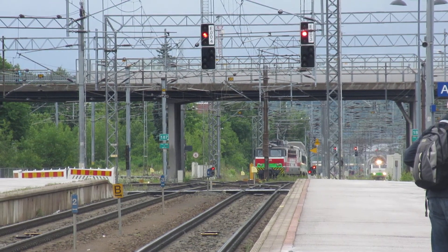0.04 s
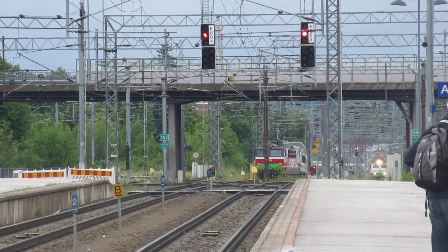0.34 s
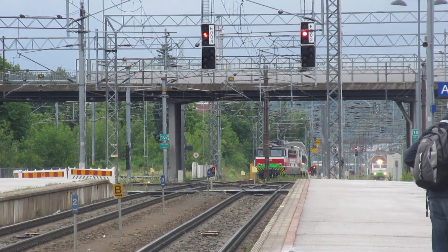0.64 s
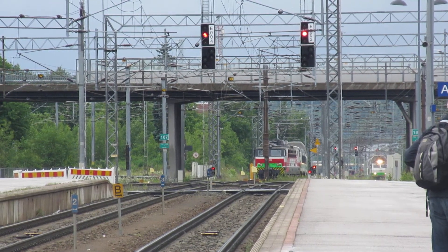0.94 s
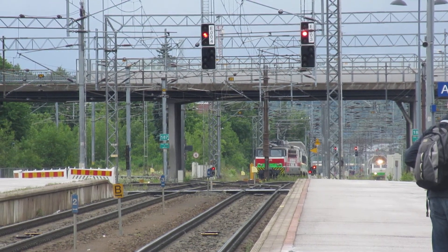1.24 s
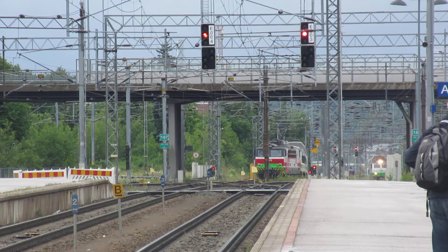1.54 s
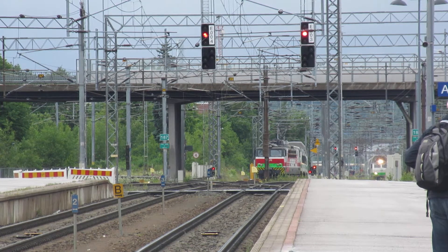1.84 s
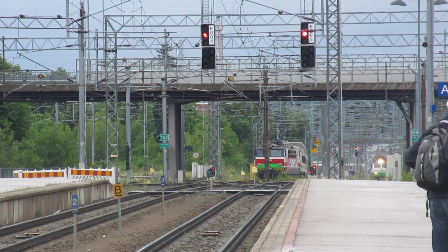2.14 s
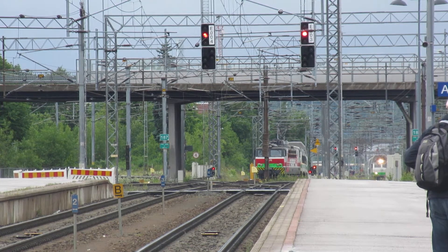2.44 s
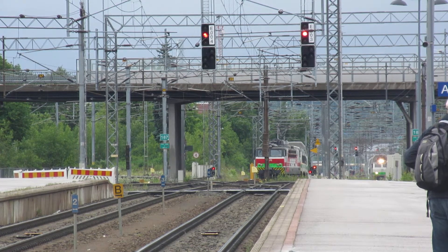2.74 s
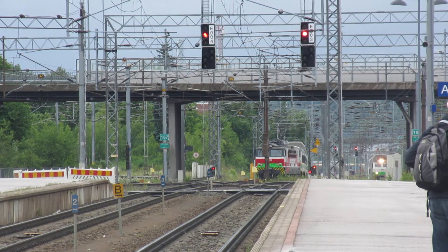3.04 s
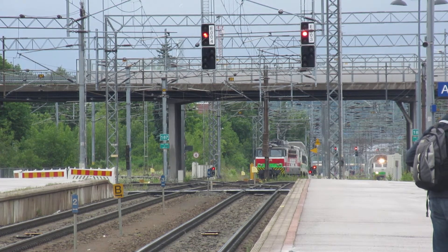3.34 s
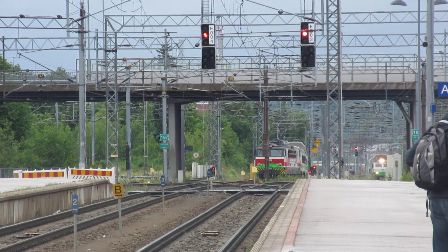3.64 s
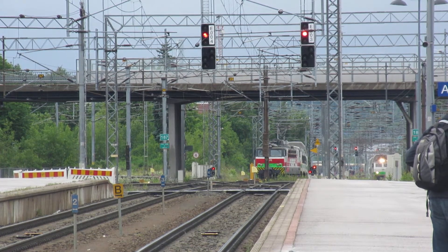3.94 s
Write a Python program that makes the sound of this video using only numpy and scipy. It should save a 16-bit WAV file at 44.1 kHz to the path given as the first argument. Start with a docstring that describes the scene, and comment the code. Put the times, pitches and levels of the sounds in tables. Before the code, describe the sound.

Wind on the microphone comes first in light puffs, then as a loud, fluttering gust that briefly pushes down the background. On an open station platform, far trains rumble and hum throughout, with a faint early squeal and one tiny click.

```python
"""Wind on an open railway platform

Far trains rumble, with the hum and thin whine of their electric drives and a faint squeal.
Wind nudges the microphone, one tiny click sounds, then a gust buffets the microphone. Two buffets
overload the recorder, whose gain control ducks the whole station and lets it creep back."""
import sys
import numpy as np
from scipy import signal
from scipy.fft import rfft, irfft
from scipy.io import wavfile
from scipy.ndimage import uniform_filter1d

SR = 44100
rng = np.random.default_rng(int(sys.argv[2]) if len(sys.argv) > 2 else 0)


def wrap_up_sound(samples):
    """Save the sound to the file named by the first command line argument, as 16-bit audio."""
    columns = np.atleast_2d(samples).T
    # keep every value between -1 and 1, then stretch to whole-number steps
    tamed = np.clip(columns, -1, 1)
    steps = np.round(tamed * 32767).astype(np.int16)
    wavfile.write(sys.argv[1], SR, steps)


N = 176400
T = np.arange(N) / SR


def amp(db):
    """Decibels to gain."""
    return 10 ** (np.asarray(db) / 20)


def unit(x):
    """Scales to rms 1."""
    return x / np.sqrt(np.mean(x ** 2) + 1e-20)


def curve(rows):
    """A table of (time_s, value) read at every sample."""
    return np.interp(T, *np.transpose(rows))


def colour(spectrum, hz):
    """Gain of a table of (frequency_hz, level_db) at these frequencies."""
    points_hz, db = np.transpose(spectrum)
    return amp(np.interp(np.log(hz + 1), np.log(points_hz + 1), db))


def noise(shape):
    """Noise of rms 1 whose spectrum is shape(hz)."""
    white = rfft(rng.standard_normal(N))
    return unit(irfft(white * shape(np.fft.rfftfreq(N, 1 / SR)), N))


def drift(rate_hz):
    """Random wander of rms 1, up to about this rate."""
    return noise(lambda f: np.exp(-(f / rate_hz) ** 2) * (f > 0))


def tone(hz):
    """A sine of rms 1 that follows a pitch curve."""
    return np.sqrt(2) * np.sin(2 * np.pi * (np.cumsum(hz) / SR + rng.random()))


# Far trains and town, heard from the open platform: frequency_hz, relative_db
RUMBLE_SPECTRUM = [(15, -18), (30, -3), (60, -6), (110, -2.5), (170, 0), (240, -6.5), (330, -11),
                   (450, -11), (600, -12), (760, -17), (920, -16.5), (1100, -20.5), (1600, -22.5),
                   (2200, -27), (3000, -29.5), (3950, -33), (4450, -39), (7000, -48), (11000, -55),
                   (15000, -63.5)]
def rumble(level_db=-27, patch_db=1, swell_db=-0.03):
    """Trains and town blur with distance into dull noise with drifting patches of colour."""
    frames, hz = N // 512 + 5, np.fft.rfftfreq(2048, 1 / SR)
    real, imaginary, patches = rng.standard_normal((3, frames, len(hz)))
    patches = uniform_filter1d(patches, size=10, axis=0)  # smooth in time
    patches = unit(uniform_filter1d(patches, size=12, axis=1))  # and in frequency
    spectra = (real + 1j * imaginary) * colour(RUMBLE_SPECTRUM, hz) * amp(patch_db * patches)
    wash = signal.istft(spectra.T, nperseg=2048, noverlap=1536)[1][:N]
    return unit(wash) * amp(level_db + swell_db * drift(rate_hz=18))


# A far locomotive's hum as it reaches the platform: time_s, level_db
HUM_LEVEL = [(0, -34), (.17, -32.5), (.35, -35), (.43, -53), (.52, -38), (.66, -40.5), (.8, -34.5),
             (1.0, -32.5), (1.1, -50), (1.24, -48), (1.33, -35), (1.5, -30.5), (1.56, -41.5), (1.68, -34),
             (1.82, -38.5), (2.0, -29.5), (2.22, -32.5), (2.31, -60), (2.48, -32), (2.75, -59.5),
             (4, -44.5)]
def locomotive_hum(pitch_hz=406.1, waver=0.0036):
    """One wavering tone that fades in and out on the air."""
    return amp(curve(HUM_LEVEL)) * tone(pitch_hz * (1 + waver * drift(rate_hz=10.7)))


# A far train's whine, faint at the microphone: time_s, level_db
WHINE_LEVEL = [(0, -60), (.19, -50), (.3, -59), (.42, -54), (.63, -48), (.8, -57), (.93, -45), (1.03, -50),
               (1.1, -61), (1.2, -51), (1.3, -59), (1.55, -56), (1.68, -50), (1.85, -45), (2.27, -47.5),
               (2.55, -52), (3.15, -58), (3.46, -50), (3.7, -47), (4, -52)]
# The same whine climbing: time_s, pitch_hz
WHINE_RISE = [(0, 3082), (.63, 3095), (1.6, 3113), (2.3, 3120), (4, 3129)]
def drive_whine(flutter_db=1.8, waver=.001):
    """An electric drive's thin, fluttering whine rises as the train slowly gathers speed."""
    level_db = curve(WHINE_LEVEL) + flutter_db * drift(rate_hz=58)
    pitch_hz = curve(WHINE_RISE) * (1 + waver * drift(rate_hz=90))
    return amp(level_db) * tone(pitch_hz)


# Engines and drives, well away from the platform: pitch_hz, level_db, width_hz
ENGINE_TONES = [(72.6, -42, 5.7), (102, -42.5, 6.2), (268.66, -44.5, 9), (802, -51, 8.2), (921, -51, 23.24),
                (1205, -53, 22.6), (1437, -66.5, 25), (1540, -60, 23.6)]
# High switching tones of their electronics: pitch_hz, level_db, width_hz
SWITCHING_TONES = [(3950, -65, 8), (4049, -60, 2), (8000, -82, 2), (11916, -83, 6), (12050, -81, 50)]
def steady_drives():
    """Engines and drive electronics hold their notes, wavering with distance."""
    out = np.zeros(N)
    for pitch_hz, level_db, width_hz in ENGINE_TONES + SWITCHING_TONES:
        note = tone(pitch_hz + width_hz / 2 * drift(rate_hz=13.6))
        fading = 1 + 0.25 * drift(rate_hz=2.7)
        out += amp(level_db) * unit(note * fading)
    return out


# Wind right on the microphone, nudges and then a gust: time_s, level_db
WIND_LEVEL = [(0, -33), (.22, -28.5), (.35, -49), (.74, -27.5), (1.1, -60), (1.6, -54), (1.71, -26),
              (1.8, -36), (2.5, -39), (2.62, -22), (2.81, -20.5), (2.85, -17), (2.89, -17), (2.99, -15.5),
              (3.045, -25), (3.075, -12.5), (3.1, -21.5), (3.14, -9.5), (3.24, -12.5), (3.31, -22),
              (3.41, -15), (3.49, -13.5), (3.53, -11), (3.57, -8.5), (3.62, -9), (3.68, -15.5), (3.83, -23),
              (3.89, -26.5), (4, -19.5)]
# Low turbulence around the microphone: frequency_hz, relative_db
FLOW_SPECTRUM = [(15, -46), (35, 12.5), (65, 7.5), (150, 7.5), (260, -6), (400, -21), (600, -39.5),
                 (1000, -24), (2500, -80)]
# Small eddies in that flow: frequency_hz, relative_db
EDDY_SPECTRUM = [(100, -13), (220, 1), (350, -1.5), (550, -16), (900, -26), (2000, -62.5)]
def wind(flow_lump_db=0.5, eddy_lump_db=5.5, eddy_mix_db=-13.5):
    """Lumpy low turbulence and ragged small eddies, both following the gust."""
    flow = noise(lambda f: colour(FLOW_SPECTRUM, f)) * amp(flow_lump_db * drift(rate_hz=45))
    eddies = noise(lambda f: colour(EDDY_SPECTRUM, f)) * amp(eddy_lump_db * drift(rate_hz=60))
    return (unit(flow) + amp(eddy_mix_db) * unit(eddies)) * amp(curve(WIND_LEVEL))


# Single eddies striking the microphone: centre_s, peak_db, pitch_hz
EDDY_STRIKES = [(.052, -17, 68), (0.205, -13, 70), (0.239, -14.5, 109), (0.534, -20, 60), (0.905, -11, 78),
                (1.701, -9, 69), (1.715, -11.5, 162), (2.841, -11, 126), (2.854, -3.5, 80),
                (2.912, -5.5, 264), (2.926, 1, 140), (2.958, -14, 200), (2.983, 1.5, 182),
                (3.001, -4.5, 230), (3.072, -5.5, 112), (3.098, 6.6, 90), (3.137, 0, 290), (3.149, -4, 170),
                (3.168, 1, 230), (3.187, -6.5, 384), (3.202, 0, 330), (3.227, -0.5, 284),
                (3.252, -6.5, 347), (3.367, -0.5, 201), (3.392, -8.5, 254), (3.421, -3, 167),
                (3.442, -6, 296), (3.449, 1.5, 260), (3.487, 1, 243), (3.515, -19, 166), (3.529, -3, 240),
                (3.541, -5, 294), (3.5447, 9.6, 540), (3.587, -1, 248), (3.598, 5, 90.5), (3.613, -10, 190),
                (3.622, -1.5, 168), (3.659, -4, 227), (3.737, -6, 214), (3.822, -7, 99)]
def buffets():
    """Each eddy is one push of pressure with suction before and after."""
    out = np.zeros(N)
    for centre_s, peak_db, pitch_hz in EDDY_STRIKES:
        offset_squared = (np.pi * pitch_hz * (T - centre_s)) ** 2
        out += amp(peak_db) * (1 - 2 * offset_squared) * np.exp(-np.minimum(offset_squared, 50))
    return out


# Squeals from far down the line: start_s, length_s, pitch_hz, relative_db
FAR_SQUEALS = [(.6, .1, 938, -36), (.66, .07, 1440, -45), (.71, .06, 945, -35), (.71, .05, 1475, -32),
               (.785, .045, 1455, -35), (.81, .1, 970, -40), (.84, .12, 1470, -44)]
def squeals(gain_db=-2, waver=.04, echo_db=-4, echo_t60_s=.5):
    """Short, unsteady squeals, smeared by echoes from the yard on their way to the platform."""
    direct = np.zeros(N)
    for start_s, length_s, pitch_hz, relative_db in FAR_SQUEALS:
        arch = np.sin(np.pi * np.clip((T - start_s) / length_s, 0, 1))
        direct += amp(relative_db) * arch * tone(pitch_hz * (1 + waver * drift(rate_hz=130)))
    tail = rng.standard_normal(SR) * np.exp(-np.log(1000) * T[:SR] / echo_t60_s)
    echoes = signal.fftconvolve(direct, tail / np.linalg.norm(tail))[:N]
    return amp(gain_db) * (direct + amp(echo_db) * echoes)


def tick(start_s=1.4233, peak_db=-24, decay_s=.00006):
    """One tiny dry click."""
    age_s = T - T[round(start_s * SR)]
    return amp(peak_db) * (age_s >= 0) * np.exp(-abs(age_s) / decay_s)


def scene():
    """The far trains and the close wind at one microphone on the platform."""
    trains = rumble() + locomotive_hum() + drive_whine() + steady_drives() + squeals()
    return (trains + wind() + buffets() + tick())[None]


def ducking(x, attack_s=.004, lookahead_s=.0006, release_db_per_s=13):
    """The recorder's gain cut in dB: it quickly catches peaks over full scale, then creeps back."""
    over_db = 20 * np.log10(np.maximum(abs(x), 1))
    release_db = release_db_per_s * T
    held_db = np.maximum.accumulate(over_db + release_db) - release_db
    smoothed_db = uniform_filter1d(held_db, size=int(attack_s * SR))
    return np.interp(T + lookahead_s, T, smoothed_db)


def record(dry, knee=.9, band_edge_hz=15100):
    """The recorder ducks, softly clips what slips past, and cuts off the highest treble."""
    ducked = dry * amp(-ducking(dry[0]))
    linear = np.clip(ducked, -knee, knee)
    clipped = linear + (1 - knee) * np.tanh((ducked - linear) / (1 - knee))
    lowpass = signal.firwin(511, band_edge_hz, window=("kaiser", 9), fs=SR)
    return signal.oaconvolve(clipped, lowpass[None], "same")


dry = scene()
out = record(dry)
wrap_up_sound(out)
```